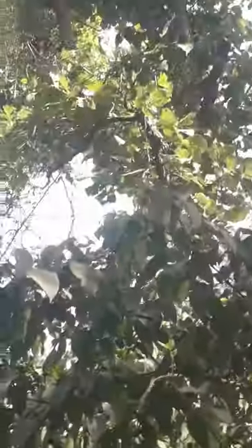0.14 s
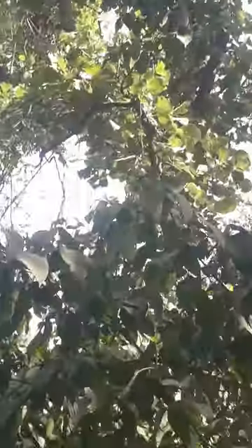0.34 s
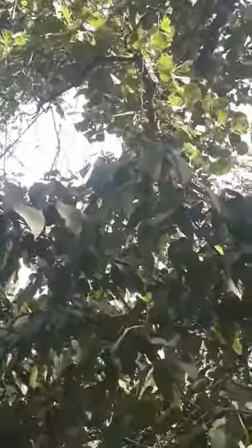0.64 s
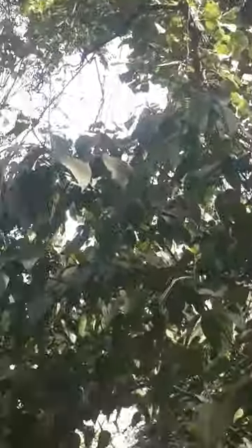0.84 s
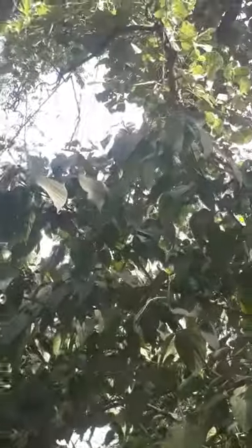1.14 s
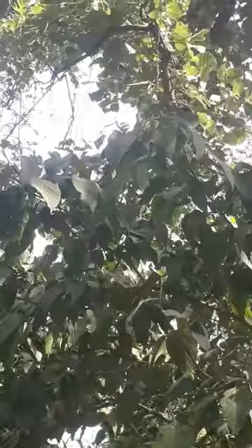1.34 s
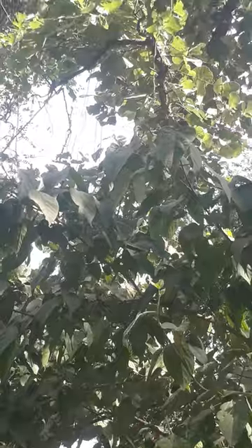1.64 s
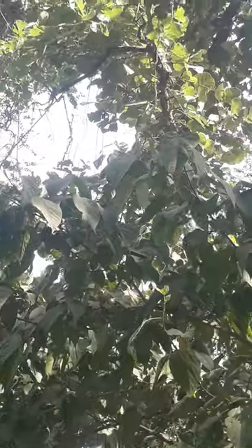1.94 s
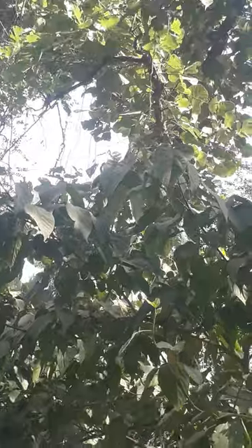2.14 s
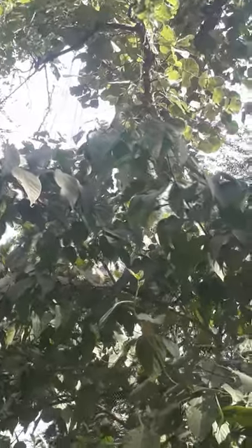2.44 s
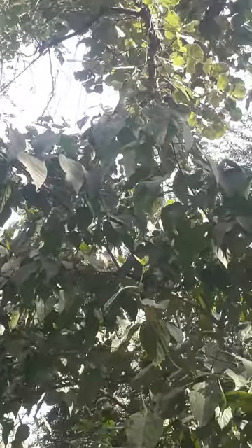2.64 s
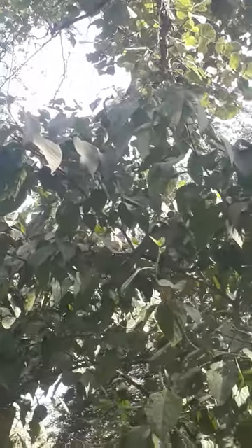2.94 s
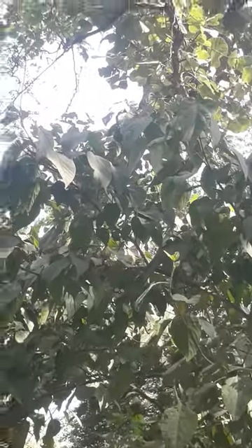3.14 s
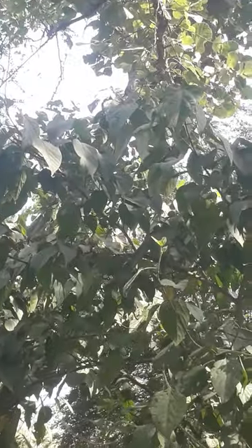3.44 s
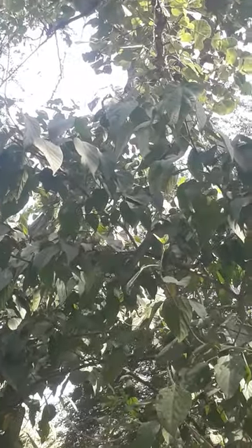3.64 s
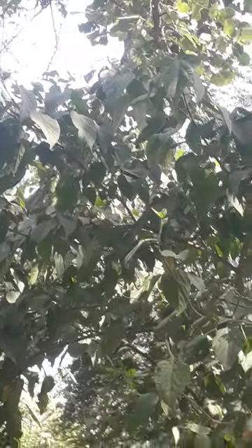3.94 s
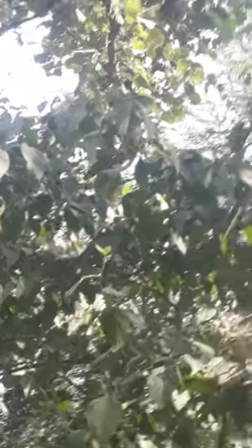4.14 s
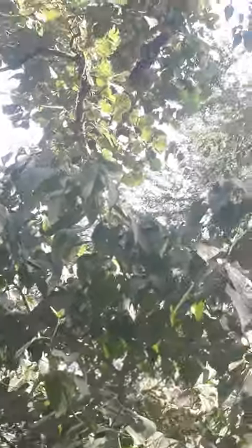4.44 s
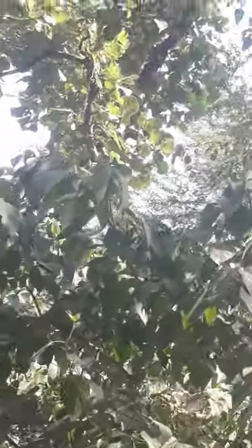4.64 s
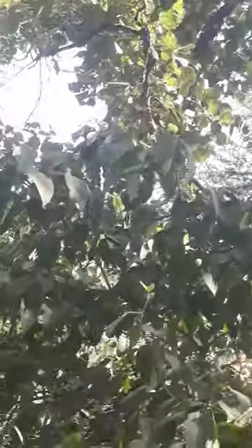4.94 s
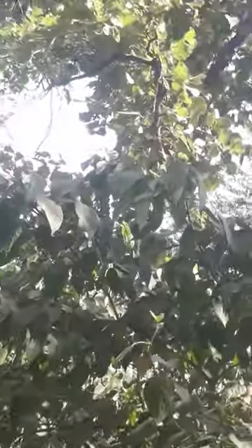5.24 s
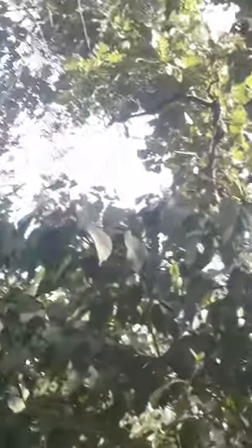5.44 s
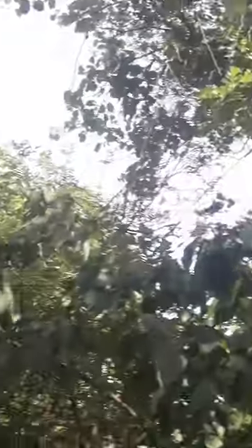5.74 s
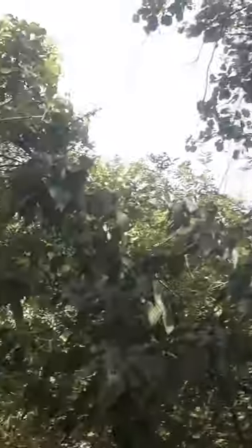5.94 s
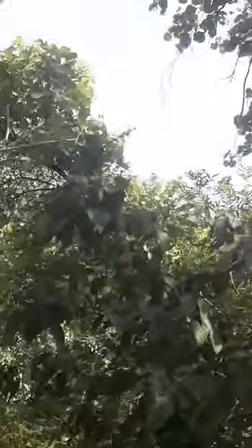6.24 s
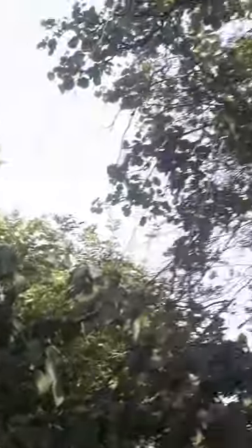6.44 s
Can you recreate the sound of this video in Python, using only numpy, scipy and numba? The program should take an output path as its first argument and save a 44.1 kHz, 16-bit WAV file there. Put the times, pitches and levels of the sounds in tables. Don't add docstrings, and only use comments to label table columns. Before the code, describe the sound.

A steady shrill insect buzz fills an outdoor grove, with little difference between the two channels. Fingers bump the phone and dry leaves tick while distant bats squabble. A close bat screeches harshly twice, the second longer and flatter, grunting as it draws breath, then yelps twice, the last one weaker. The buzz is left almost alone before crackling steps, sharp twig snaps, more far bat chatter and two faint falling bird whistles.

```python
import sys
import numpy as np
from scipy import signal
from scipy.fft import rfft, irfft
from scipy.io import wavfile
from scipy.ndimage import uniform_filter1d
from numba import njit

SR = 44100
rng = np.random.default_rng(int(sys.argv[2]) if len(sys.argv) > 2 else 0)


def to_linear_factor(level_db):
    exponent = np.asarray(level_db, float) / 20
    return 10 ** exponent


def generate_wav(signal):
    frames = np.transpose(np.atleast_2d(signal))
    scaled = np.clip(frames, -1, 1) * 32767
    pcm = np.round(scaled).astype(np.int16)
    wavfile.write(sys.argv[1], SR, pcm)


N = 290310
TIME_S = np.arange(N) / SR

# f/Hz, level/dB per Hz
AIR_SPECTRUM = [(18, -29), (40, -1), (65, 4), (130, 1), (250, -6.5), (700, -10), (1600, -10.5), (2600, -13),
                (4800, -22.5), (9500, -24), (16000, -23.5)]
CICADA_SPECTRUM = [(2940, -33.5), (5000, -19), (5820, -9), (6250, -2), (6820, 5.5), (7330, 6.5), (7610, 3),
                   (8660, -7.5), (9450, -26.5), (9800, -36), (12700, -43), (21600, -120)]
SIDE_SPECTRUM = [(18, -5), (300, -2), (1000, -4.5), (4000, -8.5), (9000, -16.5), (15700, -4)]
AIR_DB, CICADAS_DB, CICADA_CLICKS_PER_S = -62, -49, 22000

# t/s, peak level/dB
CHIRPS = [
    (.443, -59),
    (0.4718, -54),
    (0.9194, -56),
    (1.3493, -50.5),
    (1.575, -59),
    (1.7888, -52),
    (2.015, -54),
]

# t/s, length/s, scrape level/dB, crackle level/dB
STIRS = [(0, 0.006, -44, -57), (0.009, 0.026, -50, -75), (0.514, 0.011, -55, -56),
         (0.544, 0.071, -58.5, -70), (0.784, 0.033, -54, -63), (0.88, .03, -86, -70),
         (0.937, 0.24, -65, -78), (1.218, 0.0099, -71, -82), (1.598, 0.079, -66, -85),
         (3.876, 0.031, -74, -69), (4.194, 0.29, -66.5, -101), (4.442, 0.091, -55, -66),
         (4.617, 0.11, -55.5, -72), (4.735, 0.2, -62.5, -80), (5.03, 0.039, -56, -81),
         (5.232, 0.066, -60.5, -70.5), (5.339, 0.068, -59.5, -66.5), (5.595, 0.12, -80, -75),
         (5.892, 0.1, -62.5, -73), (6.084, 0.069, -58, -103), (6.246, 0.097, -60, -78),
         (6.34, 0.036, -52, -63.5), (6.423, 0.11, -56.5, -69), (6.543, 0.055, -56, -67)]
STIR_RISE_S, STIR_T60_S, STILL_SCRAPE_DB, STILL_CRACKLE_DB = 0.0054, 0.1, -83.5, -88.5

# t/s, peak level/dB, ring f/Hz, t60/s, snap level/dB
BUMPS = [(0.004, -48, 166, 0.11, 14.5), (0.756, -50.5, 276, .025, -6), (0.807, -30.5, 190, 0.019, -12),
         (1.067, -52, 330, 0.04, -20), (1.076, -47, 420, .03, -9), (1.225, -15.5, 323, .014, -14.5),
         (4.448, -58, 250, 0.11, -8), (4.643, -58, 370, 0.13, -16), (4.689, -54, 161, 0.047, -13),
         (4.811, -66, 242, .025, -5), (4.837, -53, 260, 0.042, 1)]
# t/s, peak level/dB, snap level/dB
TWIG_SNAPS = [
    (0.683, -48, -7),
    (4.236, -39, -5),
    (5.22, -29.5, -6),
    (6.03, -38, -11),
    (6.094, -43, -7),
    (6.406, -38, 3),
]
# t/s, peak level/dB, ring f/Hz
TICKS = [(.003, -49, 3030), (0.0535, -59, 4000), (.053, -54, 5450), (0.3636, -62, 4000),
         (0.4166, -61, 1900), (.418, -61, 900), (0.5167, -62, 3180), (0.6915, -57, 1160),
         (0.6904, -56, 2870), (0.883, -58, 3570), (.883, -58, 5200), (.8832, -61, 2300), (.975, -63, 1900),
         (.976, -64, 3900), (1.1528, -52, 3800), (1.153, -60, 5000), (1.2894, -65, 4200),
         (1.6441, -63, 3900), (3.896, -63, 2630), (4.443, -54.5, 2760), (4.468, -51, 5200),
         (4.485, -52, 2700), (4.49, -56, 4900), (4.4951, -49.5, 2580), (4.522, -59, 1200),
         (4.56, -62, 4800), (4.59, -61, 4500), (4.591, -63, 900), (4.682, -62, 3900), (4.4972, -53, 1400),
         (4.9164, -66, 1370), (4.914, -61, 4800), (4.917, -60, 2390), (5.034, -63, 2580), (5.05, -63, 2620),
         (5.05, -61, 1000), (5.24, -62, 5000), (5.24, -63, 2150), (5.2153, -68, 1090), (5.2565, -59, 1880),
         (5.2755, -55.5, 2350), (5.4307, -53, 1730), (5.8944, -59, 5200), (5.913, -61, 4200),
         (5.905, -59, 1350), (5.906, -59, 4100), (6.033, -55.5, 2960), (6.158, -59, 3480),
         (6.159, -62, 1000), (6.2692, -62, 1150), (6.3504, -54, 1460), (6.352, -56, 5200),
         (6.4354, -57, 1860),
         (.016, -62, 12000), (.52, -64, 12000), (1.2255, -56, 11000), (4.497, -68, 12000),
          (5.302, -72, 12500), (5.346, -67, 12500), (6.325, -72, 13500), (6.352, -62, 13500),
          (6.357, -64, 11000), (6.366, -67, 14000), (6.378, -65, 12500), (6.553, -65, 11300),
          (6.554, -67, 13500), (6.562, -68, 14500)]
TWIG_HZ, TWIG_T60_S, SNAP_HZ, TICK_T60_S = 322, 0.0073, 1320, 0.012

# t/s, length/s, level/dB, throat f/Hz
SQUABBLES = [(0.01, 0.12, -62.5, 1370), (0.22, 0.029, -64.5, 1500), (0.405, 0.05, -65, 1420),
             (0.508, 0.02, -49, 1500), (0.572, 0.045, -59, 1500), (0.798, 0.11, -66, 1550),
             (0.955, 0.02, -69, 1750), (1.18, 0.41, -76, 1500), (1.442, 0.042, -64, 1550),
             (1.586, 0.05, -56, 1500), (1.713, .05, -64.5, 1340), (2.12, 0.045, -60, 1720),
             (3.77, 0.08, -71, 1630), (3.977, 0.11, -70.5, 1550), (4.23, 0.073, -65, 1470),
             (4.406, 0.12, -61.5, 1490), (4.544, .09, -65, 1530), (4.717, 0.1, -66, 1550),
             (4.9, 0.091, -69, 1370), (5.03, 0.12, -65.5, 1870), (5.295, 0.073, -63.5, 1700),
             (5.353, .1, -63.5, 1650), (5.543, .12, -62, 1750), (5.69, 0.072, -65.5, 1510),
             (5.988, 0.036, -69, 1630), (6.266, 0.14, -65, 1450), (6.466, 0.018, -47, 1630),
             (6.517, 0.11, -57.5, 1500)]
# f/Hz, width/Hz, level/dB
COLONY_HIGH = [(2376, 540, 5), (3260, 1150, 10), (4150, 3000, 8)]
SQUABBLE_RISE_S, SQUABBLE_T60_S, MURMUR_DB, MURMUR_HZ = 0.014, 0.28, -75, 1550
SHRILL_DB, SHRILL_MURMUR_DB, RESTLESS_DB = -6, -70.5, 2.2

# t/s, length/s, f/Hz, level/dB, blur/Hz
CRIES = [(0.067, 0.02, 1270, -59, 150), (0.131, 0.014, 1200, -55, 150), (0.513, 0.037, 1305, -46, 200),
         (0.514, .02, 2330, -52.5, 150), (0.517, .045, 3160, -60.5, 300), (0.542, 0.076, 1320, -52, 129),
         (2.418, 0.17, 1310, -62.5, 400), (3.293, 0.14, 1750, -63, 350), (4.857, 0.17, 2340, -64.5, 200),
         (4.236, 0.027, 646, -53.5, 1400), (4.859, 0.11, 3100, -67, 300), (4.895, 0.055, 3500, -65, 150),
         (4.91, 0.04, 1335, -61, 80), (5.098, .024, 1970, -59, 250), (5.295, .03, 1750, -61, 120),
         (5.429, 0.033, 1830, -57, 150), (6.463, 0.023, 1820, -42, 600), (6.463, 0.018, 5500, -49, 200),
         (6.547, 0.023, 203, -58, 40)]
# t/s, length/s, first f/Hz, last f/Hz, level/dB
GLIDES = [
    (2.105, .022, 1430, 1620, -64),
    (3.752, 0.25, 1650, 1410, -66.5),
]
GLIDE_BLUR_HZ = 350

# t/s, fold rate f/Hz, effort level/dB, throat f/Hz, rasp/0-1
SCREECHES = [
    [(2.17, 740, -30.5, 3320, 0.4), (2.19, 739.6, -28.5, 3210, 0.6), (2.25, 711, -29.5, 3160, 0.63),
     (2.32, 733, -31, 3150, 0.93), (2.392, 699.5, -30.5, 3260, 0.94), (2.42, 668, -38.5, 3150, 0.1)],
    [(2.555, 663.5, -51.5, 2770, 0.4), (2.572, 667, -36.5, 2720, 0.7), (2.593, 664, -30.5, 2830, 0.7),
     (2.617, 654, -33.5, 2730, 1), (2.78, 642.8, -30, 3170, 0.64), (2.89, 641.5, -29.5, 3200, 0.53),
     (2.963, 641, -27.5, 3040, 0.8), (2.985, 639, -28, 2950, 1), (3.002, 597, -43, 3000, 1)],
]
YELPS = [
    [(3.126, 1260, -44, 3750, .05), (3.135, 1448, -36, 2940, .05), (3.139, 1650, -31, 3200, 0.044),
     (3.143, 1750, -36, 3330, 0.18), (3.15, 1824, -31.5, 3550, .3), (3.158, 1662, -26.5, 3350, 0.63),
     (3.168, 1605, -31, 3220, 0.67), (3.178, 1587, -38.5, 3300, 0.65), (3.2, 1630, -56, 3200, 0.44)],
    [(3.406, 1067, -57, 3300, .05), (3.413, 1195, -53, 3500, .05), (3.421, 1340, -47, 2900, .05),
     (3.426, 1443, -36, 3240, 0.22), (3.445, 1500, -34.5, 3600, 1), (3.458, 1500, -46, 3470, 1),
     (3.49, 1480, -67, 3300, 1)],
]
# mouth f/Hz, teeth hiss level/dB, bare fundamental level/dB,
# throat share level/dB, hiss f/Hz
BUILDS = [
    (5200, -51, -65, .6, 11500),
    (5520, -52, -60.5, 1.2, 9900),
    (5750, -56, -52, 2.5, 12300),
    (5200, -47.5, -35, 1.5, 11950),
]
LARYNX_HZ = [1500, 1730, 1750, 1500]
CHEEKS_DB = [0, 0, -14, 1]
# f/Hz, width/Hz, level/dB
HEAD = [(1650, 330, -14.5), (2450, 180, -13), (7130, 1400, -2), (4100, 380, -16), (4900, 990, -3),
        (6530, 1200, 0.5)]
OPEN_OVERTONES_DB = [2, 1]
THROAT_WIDTH_HZ, MOUTH_WIDTH_HZ, TEETH_WIDTH_HZ, SKULL_TOP_HZ = 760, 850, 15000, 8400
CLOSED_JAW_DB, WAVER_DB, PART_WAVER_DB = 50, 11, 1.3
FULL_EFFORT_DB, HISS_PER_DB, BARE_PER_DB, RASP_HIDES_DB = -29, 1.05, 0.9, 6.5
HISS_ONSET_S, LIP_HISS_DB, LIP_ONSET_S, BARE_ONSET_S = 0.026, -7, .07, .06
PATCHY_DB, TREMBLE = 1.5, .03

# t/s, length/s, first f/Hz, last f/Hz, level/dB
GRUNTS = [
    (2.421, 0.054, 274, 244, -59.5),
    (2.488, 0.069, 270.5, 235, -65),
    (3.011, 0.036, 400, 426, -55),
    (3.046, 0.0656, 316.6, 274, -57.5),
]
# f/Hz, width/Hz, level/dB over the fundamental
GRUNT_THROAT = [(850, 300, -10), (1260, 220, -7), (1680, 160, -4)]
# f/Hz, level/dB over the fundamental
GRUNT_TOP = [(2900, 8), (2650, 8), (2950, 14), (3150, 15)]
GRUNT_TOP_WIDTH_HZ, GRUNT_BREATH = 600, .75

CANOPY_T60_S, CANOPY_DB, CANOPY_GAP_S, CANOPY_LOW_HZ = 0.44, -6, 0.0032, 1900

# t/s, length/s, level/dB
WHISTLES = [
    (4.852, .045, -72),
    (5.142, .085, -68),
]
WHISTLE_FIRST_HZ, WHISTLE_FALL_HZ_PER_S = 4300, 11500


def level(x, db):
    return x * to_linear_factor(db) / np.sqrt(np.mean(x ** 2))


def noise(size=N):
    return rng.standard_normal(size)


@njit
def svf(x, hz, width):
    y, band, low = np.empty(len(x)), 0., 0.
    for i in range(len(x)):
        g, k = np.tan(np.pi * hz[i] / SR), width / hz[i]
        v = (band + g * (x[i] - low)) / (1 + g * (g + k))
        band, low, y[i] = 2 * v - band, low + 2 * g * v, k * v
    return y


def ring(x, hz, width_hz):
    hz = np.full(len(x), 1.) * hz
    once = svf(x, hz, 1. * width_hz)
    return level(svf(once, hz, 1. * width_hz), 0)


def coloured(x, points):
    hz, db = np.transpose(points)
    log_hz = np.log(np.arange(N // 2 + 1) * SR / N + 1)
    gain = to_linear_factor(np.interp(log_hz, np.log(hz), db, -120, -120))
    return level(irfft(rfft(x) * gain, N), 0)


def walk(rate_hz, size=N):
    k = max(int(SR / rate_hz), 1)
    held = np.repeat(noise(size // k + 1), k)
    return 1.3 * uniform_filter1d(uniform_filter1d(held, k), k)[:size]


def shaky(source, hz, width_hz):
    size = len(source)
    centre_hz = hz * (1 + TREMBLE * walk(45, size))
    return to_linear_factor(PATCHY_DB * walk(70, size)) * ring(source, centre_hz, width_hz)


def grains(per_s, spread_db):
    return (rng.random(N) < per_s / SR) * noise() * to_linear_factor(spread_db * rng.exponential(size=N))


def bursts(s, length_s, db, rise_s, t60_s):
    t = TIME_S - np.array(s)[:, None]
    after_s = np.clip(t - np.array(length_s)[:, None], 0, 2 * t60_s)
    return to_linear_factor(np.array(db))[:, None] * np.clip(t / rise_s, 0, 1) * to_linear_factor(-60 * after_s / t60_s)


def columns(table, t):
    s, *values = np.transpose(table)
    return [np.interp(t, s, v) for v in values]


def stretch(start_s, end_s, fade_s):
    i = np.arange(int(start_s * SR), int(end_s * SR))
    edge = np.minimum(i - i[0], i[-1] - i)
    return i, i / SR, np.clip(edge / (fade_s * SR), 0, 1)


def folds(hz, rasp, jitter, flutter_db):
    size = len(hz)
    phase = np.cumsum(hz * (1 + jitter * walk(500, size) + .02 * walk(45, size))) / SR
    strong_weak = 1 + 0.49 * rasp * np.sign(np.sin(np.pi * phase))
    puff = np.exp(-(phase % 1) / 0.063) * strong_weak
    rasp = np.clip(rasp, 0, 1)
    turbulence = level((0.7 + puff) * noise(size), 0)
    source = np.sqrt(1 - rasp) * level(np.diff(puff, prepend=1), 0) + np.sqrt(rasp) * turbulence
    return source * to_linear_factor(flutter_db * walk(150, size))


def air():
    return coloured(noise(), AIR_SPECTRUM) * to_linear_factor(AIR_DB + 0.77 * walk(2.55))


def insects():
    clicks = grains(CICADA_CLICKS_PER_S, 0.21)
    out = coloured(clicks, CICADA_SPECTRUM) * to_linear_factor(CICADAS_DB + .5 * walk(2.27) + 0.33 * walk(19))
    for s, db in CHIRPS:
        swell = np.exp(-((TIME_S - s - .012) / 0.012) ** 2)
        out += to_linear_factor(db - 8.0) * swell * np.sin(2 * np.pi * 3350 * TIME_S)
    return out


def rustle():
    s, length_s, scrape_db, crackle_db = np.transpose(STIRS)
    stir = bursts(s, length_s, 0 * s, STIR_RISE_S, STIR_T60_S)
    scrape = level(svf(grains(1100, 0.65), np.full(N, 240.), 420.0), 0)
    leaf_spectrum = [(1500, 19), (3000, 22.2), (6000, 27.6), (10000, 2.2), (16000, 10)]
    crackle = coloured(grains(5924, 0.98), leaf_spectrum)
    scrape_gain = to_linear_factor(scrape_db - 4.0) @ stir + to_linear_factor(STILL_SCRAPE_DB)
    crackle_gain = to_linear_factor(9.5) * (to_linear_factor(crackle_db) @ stir + to_linear_factor(STILL_CRACKLE_DB))
    return scrape_gain * scrape + crackle_gain * crackle


def knocks():
    out, t = np.zeros(N + SR), TIME_S[:SR // 8]
    twigs = [(s, db, TWIG_HZ, TWIG_T60_S, snap_db) for s, db, snap_db in TWIG_SNAPS]
    for s, db, hz, t60_s, snap_db in [*BUMPS, *twigs]:
        bent_t = t + 0.00075 * (1 - np.exp(-t / 0.00031))
        swing = -np.sin(2 * np.pi * hz * bent_t) * to_linear_factor(-60 * t / t60_s) * (1 - np.exp(-t / 0.00052))
        snap = np.sin(2 * np.pi * SNAP_HZ * t) * to_linear_factor(snap_db + 4.0 - 60 * t / 0.0027)
        grit = ring(noise(len(t)), 2400, 4000) * to_linear_factor(snap_db - 12.0 - 60 * t / 0.014)
        out[int((s + .0016) * SR):][:len(t)] += to_linear_factor(db + 5.5) * (swing + snap + grit)
    for s, db, hz in TICKS:
        tone = np.sin(2 * np.pi * hz * t) * to_linear_factor(-60 * t / TICK_T60_S)
        dust = ring(noise(len(t)), hz, 0.52 * hz) * to_linear_factor(-4.5 - 60 * t / (2.8 * TICK_T60_S))
        out[int(s * SR):][:len(t)] += to_linear_factor(db + 10.0) * (tone + dust)
    return out[:N]


def colony():
    s, length_s, db, hz = np.transpose(SQUABBLES)
    each = bursts(s, length_s, db, SQUABBLE_RISE_S, SQUABBLE_T60_S)
    loud = each.sum(axis=0)
    murmur = to_linear_factor(MURMUR_DB + 2 * walk(3.78))
    throat_hz = (hz @ each + MURMUR_HZ * murmur) / (loud + murmur)
    source = folds(420 * to_linear_factor(1.5 * walk(5)), 0.48, .03, 1.9)
    low = level(shaky(source, throat_hz, 720) + 0.32 * shaky(source, 1.19 * throat_hz, 285), 0)
    high = np.zeros(N)
    for f, width_hz, band_db in COLONY_HIGH:
        high += to_linear_factor(band_db + RESTLESS_DB * walk(12)) * ring(source, f, width_hz)
    shrill = to_linear_factor(SHRILL_DB) * loud + to_linear_factor(SHRILL_MURMUR_DB + RESTLESS_DB * walk(5.49))
    return (loud + murmur) * low + shrill * level(high, 0)


def cries():
    out = np.zeros(N)
    steady = [(s, length_s, hz, hz, db, blur_hz) for s, length_s, hz, db, blur_hz in CRIES]
    gliding = [(*row, GLIDE_BLUR_HZ) for row in GLIDES]
    for s, length_s, first_hz, last_hz, db, blur_hz in steady + gliding:
        i, t, gate = stretch(s, min(s + length_s, TIME_S[-1]), 0.0063)
        hz = np.linspace(first_hz, last_hz, len(i))
        out[i] += to_linear_factor(db) * gate * ring(noise(len(i)), hz, blur_hz)
    return out


def cavities(source, throat_hz, gape, mouth_hz, throat_db, larynx_hz, cheeks_db):
    mouth_hz = mouth_hz * (throat_hz.mean() / throat_hz) ** 0.4
    voice = to_linear_factor(throat_db) * shaky(source, throat_hz, gape * THROAT_WIDTH_HZ)
    voice += shaky(source, mouth_hz, gape * MOUTH_WIDTH_HZ)
    for k, (f, width_hz, db) in enumerate(HEAD):
        f = larynx_hz if k == 0 else f
        cheek_db = cheeks_db * (3500 < f < 5500)
        sense = (-1) ** k
        voice += sense * to_linear_factor(db + cheek_db) * shaky(source, f, gape * width_hz)
    return signal.sosfilt(signal.butter(4, SKULL_TOP_HZ, fs=SR, output="sos"), voice)


def teeth_hiss(source, since_s, gape, db, hz):
    size = len(source)
    teeth = to_linear_factor(db) * (1 - np.exp(-since_s / HISS_ONSET_S))
    hiss = teeth * ring(noise(size) * (1.5 + np.abs(source)), hz, TEETH_WIDTH_HZ / gape ** 3.6)
    lips = to_linear_factor(LIP_HISS_DB) * np.clip(since_s / LIP_ONSET_S, 0, 1) ** 3
    return hiss + teeth * lips / gape ** 2 * shaky(noise(size), 14600, 3200)


def bare_voice(hz, since_s, gape, db):
    size = len(hz)
    phase = 2 * np.pi * np.cumsum(hz * (1 + .012 * walk(50, size))) / SR
    parts_db = [0, *(np.array(OPEN_OVERTONES_DB) - CLOSED_JAW_DB * (1.6 - gape))]
    tone = sum(to_linear_factor(part_db) * np.sin((k + 1) * phase) for k, part_db in enumerate(parts_db))
    waver_db = WAVER_DB / gape ** 4 * np.minimum(walk(59.5, size), .5)
    onset = 1 - np.exp(-since_s * gape ** 8 / BARE_ONSET_S)
    return to_linear_factor(db + waver_db) * onset * tone


def bat():
    out = np.zeros(N)
    for call, larynx_hz, cheeks_db, build in zip([*SCREECHES, *YELPS], LARYNX_HZ, CHEEKS_DB, BUILDS):
        mouth_hz, teeth_db, bare_db, throat_db, teeth_hz = build
        i, t, gate = stretch(call[0][0], call[-1][0], 0.0051)
        since_s = t - t[0]
        hz, effort_db, throat_hz, rasp = columns(call, t)
        source = folds(hz, rasp, 0.022, 0.84)
        gape = (hz.mean() / 650) ** .5
        voice = cavities(source, throat_hz, gape, mouth_hz, throat_db, larynx_hz, cheeks_db)
        over_db = effort_db - FULL_EFFORT_DB
        hiss = teeth_hiss(source, since_s, gape, teeth_db + HISS_PER_DB * over_db, teeth_hz)
        hidden_db = RASP_HIDES_DB * gape ** 3 * (rasp - .3)
        bare = bare_voice(hz, since_s, gape, bare_db + BARE_PER_DB * over_db - hidden_db)
        out[i] += gate * (to_linear_factor(effort_db) * level(voice, -1.02) + hiss + bare)
    return out


def canopy(x):
    t = TIME_S[:SR]
    fade = to_linear_factor(-60 * t / CANOPY_T60_S)
    bright = noise(SR) * fade
    dull = ring(noise(SR), 3600, 22000) * fade
    tail = (.5 * bright + dull) * np.clip(t / CANOPY_GAP_S, 0, 1)
    x = signal.sosfilt(signal.butter(2, CANOPY_LOW_HZ, "high", fs=SR, output="sos"), x)
    return signal.fftconvolve(x, to_linear_factor(CANOPY_DB) * tail / np.sqrt(np.sum(tail ** 2)))[:N]


def grunts():
    out = np.zeros(N)
    for (s, length_s, first_hz, last_hz, db), (top_hz, top_db) in zip(GRUNTS, GRUNT_TOP):
        i, t, gate = stretch(s, s + length_s, 0.0061)
        size = len(i)
        hz = first_hz + (last_hz - first_hz) * np.linspace(0, 1, size) ** 2
        phase = 2 * np.pi * np.cumsum(hz * (1 + 0.0197 * walk(88, size))) / SR
        partials = sum(np.cos(k * phase) for k in range(2, 16))
        source = level(partials, 0) + GRUNT_BREATH * noise(size)
        throat = [*GRUNT_THROAT, (top_hz, GRUNT_TOP_WIDTH_HZ, top_db)]
        upper = sum(to_linear_factor(part_db) * shaky(source, f, width_hz) for f, width_hz, part_db in throat)
        fundamental = to_linear_factor(2 * PART_WAVER_DB * walk(41, size)) * np.sin(phase)
        out[i] += gate * to_linear_factor(db) * (fundamental + upper)
    return out


def bird():
    out = np.zeros(N)
    for s, length_s, db in WHISTLES:
        i, t, gate = stretch(s, s + length_s, .012)
        hz = WHISTLE_FIRST_HZ - WHISTLE_FALL_HZ_PER_S * (t - s)
        tone = np.sin(2 * np.pi * np.cumsum(hz) / SR)
        out[i] += gate * to_linear_factor(db + PART_WAVER_DB * walk(60, len(i))) * tone
    return out


def scene():
    near = bat() + grunts()
    far = colony() + cries() + bird() + insects() + air()
    mid = near + canopy(near) + far + rustle() + knocks()
    call_hiss = ring(near * noise(), 11600, 9000)
    side = to_linear_factor(-76.0) * coloured(noise(), SIDE_SPECTRUM) + to_linear_factor(-90) * call_hiss
    return np.array([mid + side, mid - side])


def band_limit(x):
    return signal.sosfilt(signal.butter(12, 15730, fs=SR, output="sos"), x)


def record(dry):
    bass_cut = signal.butter(2, 60, "high", fs=SR, output="sos")
    top_cut = signal.ellip(10, .2, 60, 15720, fs=SR, output="sos")
    mix = signal.sosfilt(np.vstack([bass_cut, top_cut]), dry)
    return band_limit(mix)


dry = scene()
out = record(dry)
generate_wav(out)
```